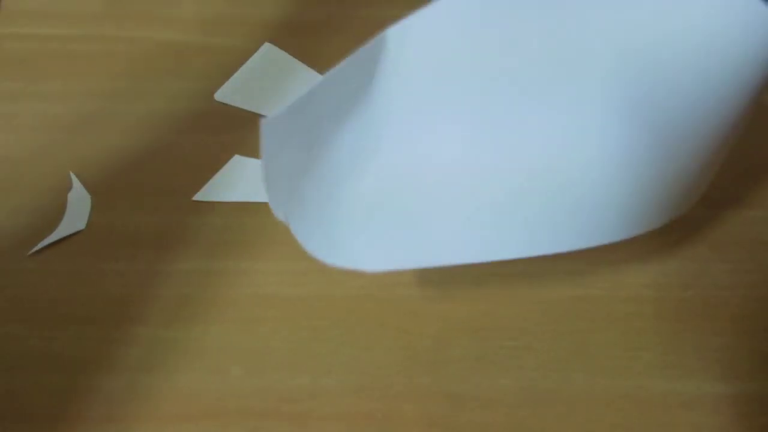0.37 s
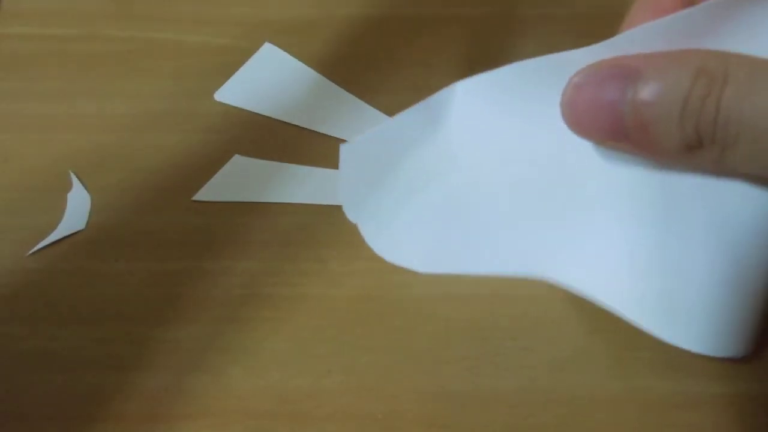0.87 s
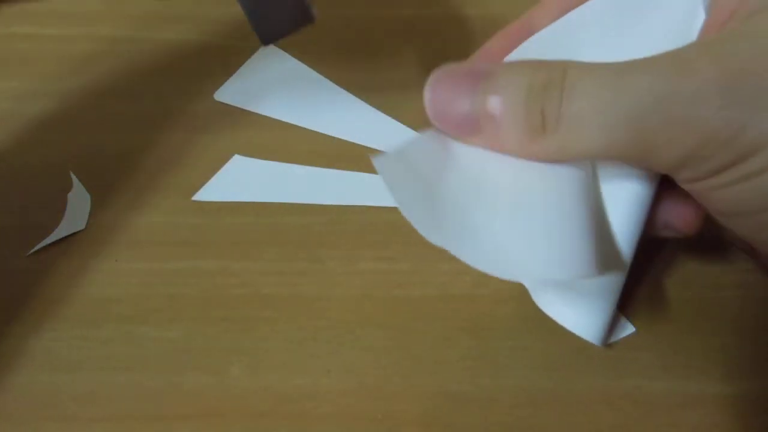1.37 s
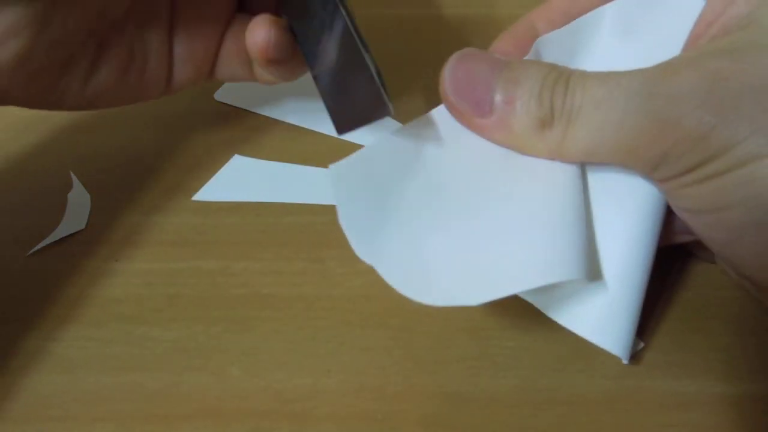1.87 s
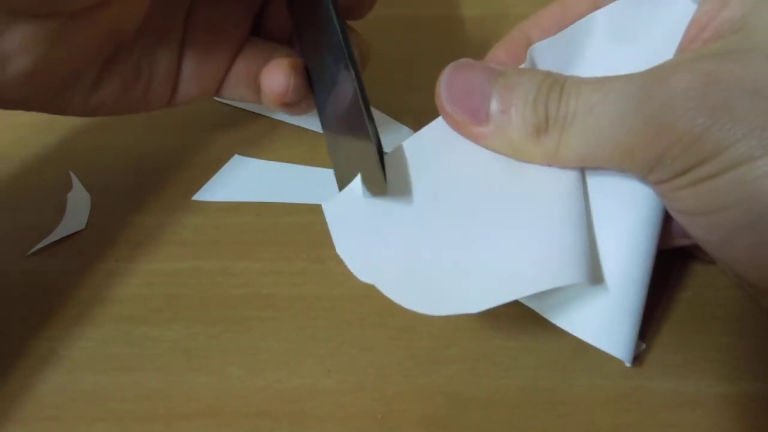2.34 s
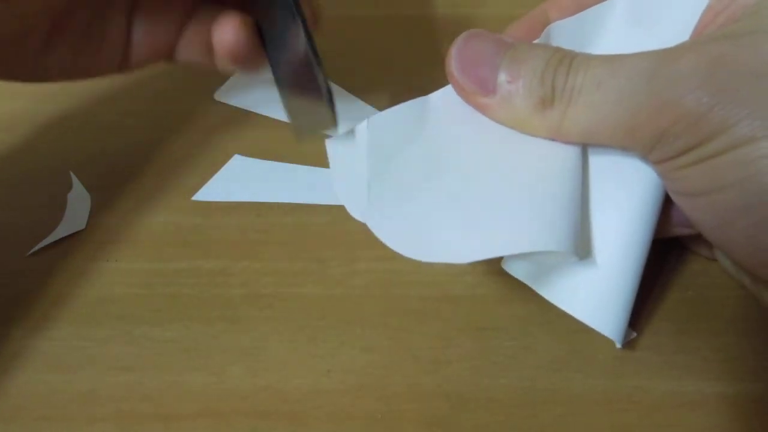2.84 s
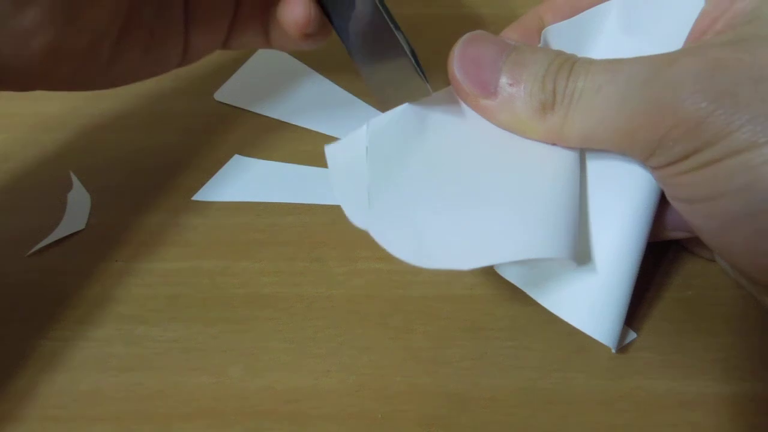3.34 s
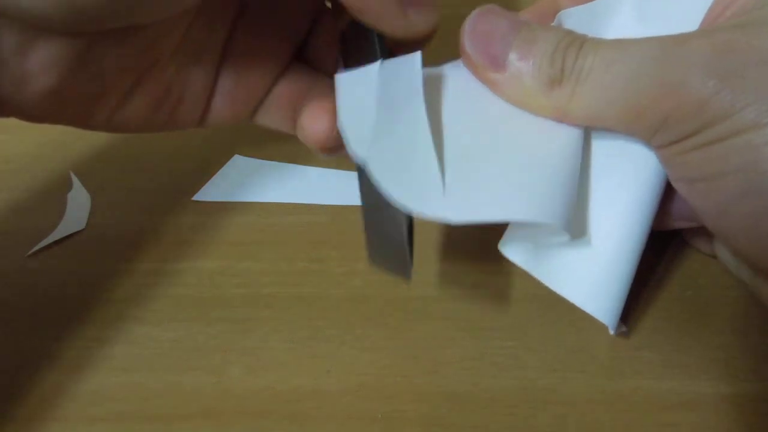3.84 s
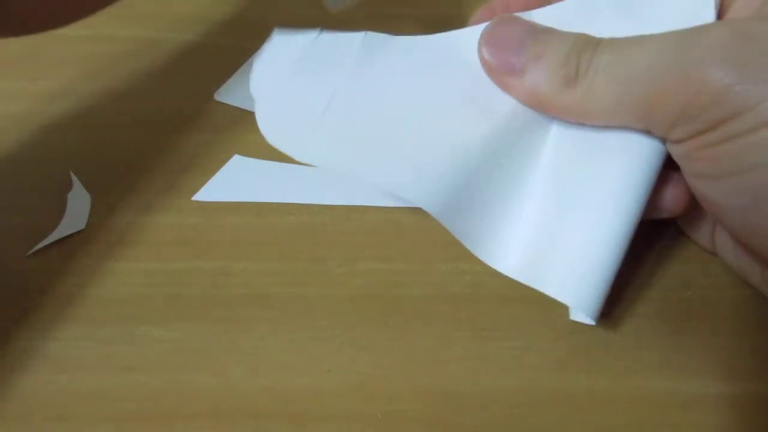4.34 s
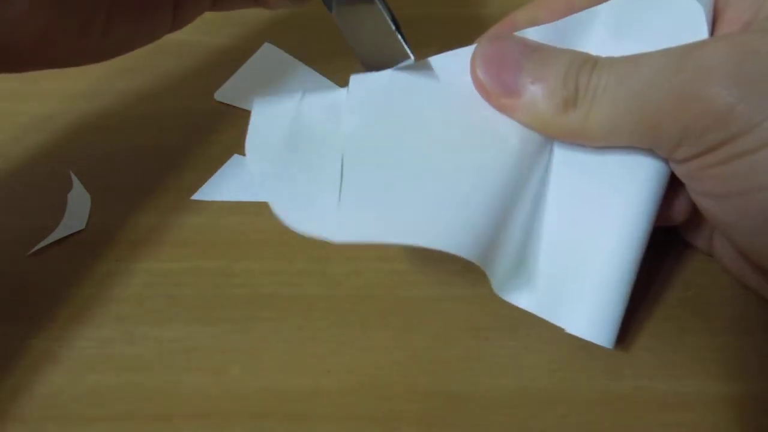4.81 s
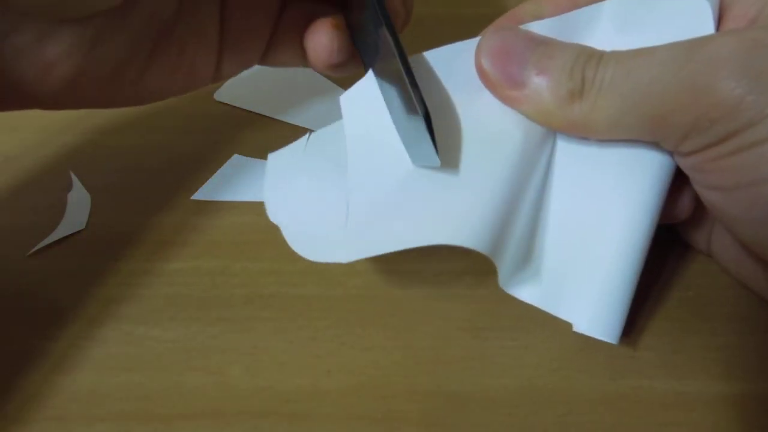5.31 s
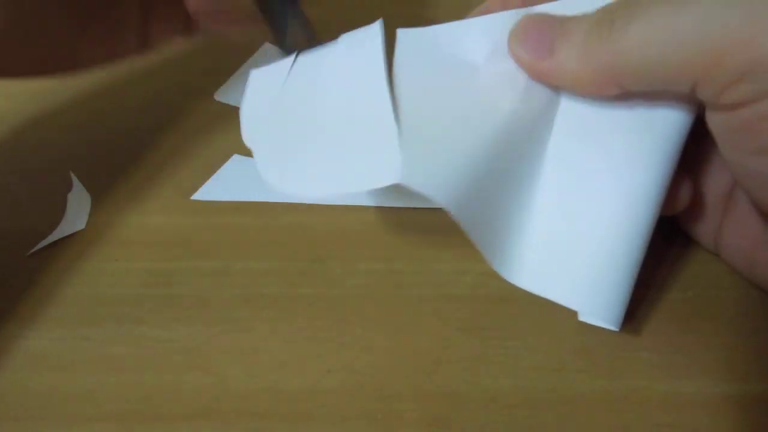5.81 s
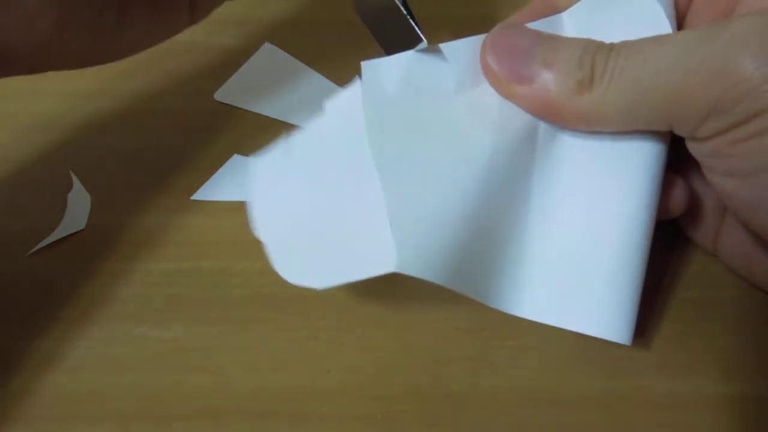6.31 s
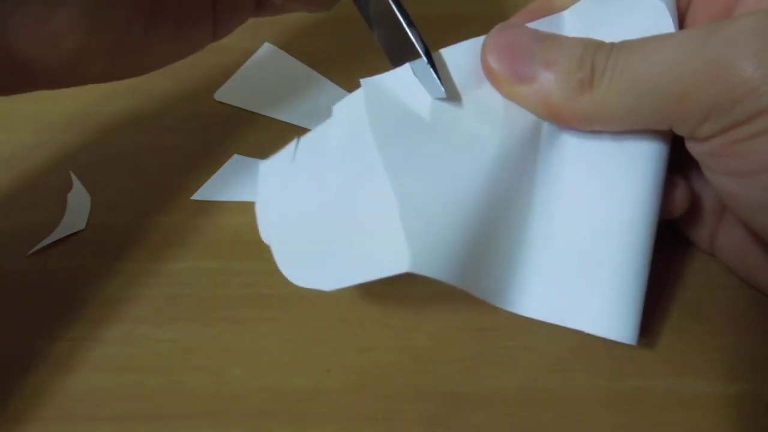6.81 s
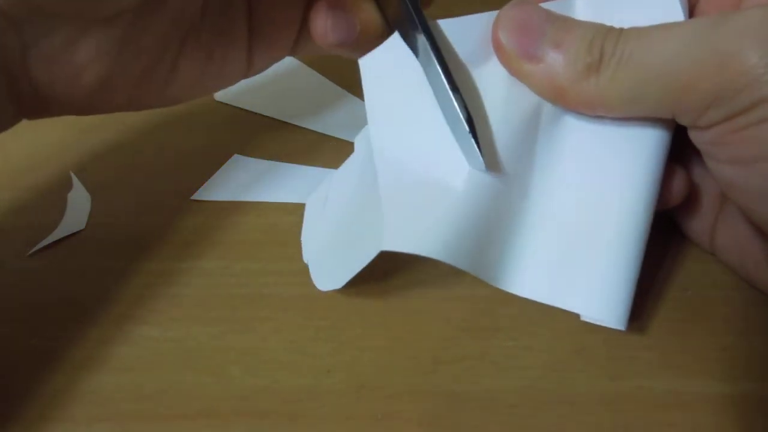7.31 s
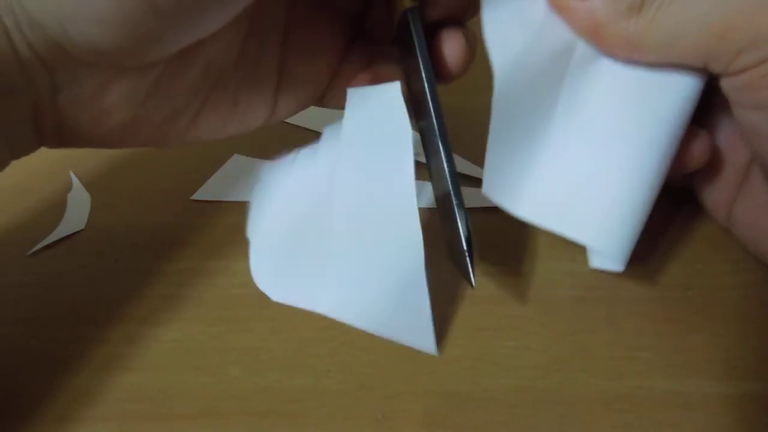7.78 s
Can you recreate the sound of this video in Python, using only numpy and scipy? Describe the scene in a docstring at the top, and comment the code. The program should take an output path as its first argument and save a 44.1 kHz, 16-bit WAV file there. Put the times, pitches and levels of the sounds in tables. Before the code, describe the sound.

A sheet of paper is shifted by hand just above a wooden table, with crinkles, snaps and dull low knocks. After a near-quiet pause, a sharp knife cuts it in four separate raspy strokes, with small rustles and crease pops between them. Very close stereo microphone, dry quiet room, faint hiss and low hum behind.

```python
"""Knife slicing a sheet of paper

A sharp knife slices a hand-held sheet of paper just above a wooden table in a quiet room.
Parting fibres are random clicks, creases snap as short ragged bursts, and fingers rub the sheet between
strokes; all of these drive broad, shifting resonances of the paper, with close echoes.
Bumps on the table are a low thud and fading tones, moving hands are lumpy low noise.
Behind them lie room tone, hiss, a far-off appliance's wavering hum and a low tone that swells and sinks.
"""
import sys
import numpy as np
from scipy import signal
from scipy.io import wavfile
from scipy.ndimage import uniform_filter1d

SR = 44100
rng = np.random.default_rng(int(sys.argv[2]) if len(sys.argv) > 2 else 0)


def wav_out(sig):
    """Save sig, one row per channel (or a flat mono array), as 16-bit PCM at SR to the path in sys.argv[1]."""
    wavfile.write(sys.argv[1], SR, np.round(np.clip(np.atleast_2d(sig).T, -1, 1) * 32767).astype(np.int16))


def volts(x):
    """Linear amplitude factor 10**(x/20) for a level x in dB, scalar or array-like."""
    e = np.asarray(x, float) / 20
    return 10 ** e


N = 348831   # length in samples

# Knife strokes, one list each: start_s, crackle_db, body_db (the sheet's belly against the crackle),
# hump_hz and hump_db (bright hump of the free flap)
CUT_STROKES = [
    [(2.27, -32, -0.5, 2940, 6.7), (2.284, -28.5, -15, 2940, 4), (2.31, -33, -14, 2940, 4.3),
     (2.338, -24, -10, 3030, 3.7), (2.38, -25.5, -14.5, 1870, 1.5), (2.391, -32, -11, 1900, 2),
     (2.404, -26, -8.5, 2000, 1.2), (2.518, -20, -14.5, 4360, 5.3), (2.568, -20.5, -14, 3000, 2.4),
     (2.67, -18.5, -13, 3670, 5), (2.704, -19.5, -10, 2350, 1.3), (2.727, -43.5, -9, 1890, 4.2)],
    [(3.487, -32, -10, 4140, 5.4), (3.591, -15.5, -13.5, 3000, 6.5), (3.635, -16, -14.5, 3340, 10.7),
     (3.771, -15, -20, 2420, 2.6), (3.799, -14, -13, 3140, 3.6), (3.859, -15, -17.5, 3600, 11),
     (3.899, -21, -3.5, 2820, 7.5), (3.915, -33.5, -12, 2600, 4.6)],
    [(5.008, -19.5, -15, 2840, 9.3), (5.088, -13, -20, 3220, 11.8), (5.416, -21, -13.5, 2220, 5.3),
     (5.456, -16.5, -16, 1940, 1.4), (5.536, -20, -11.5, 1720, 1.4), (5.582, -21.5, -8.5, 1400, 1.9),
     (5.614, -19.5, -10, 1170, 5.2), (5.64, -39.5, -1, 1300, 3.6)],
    [(6.674, -33, -13.5, 2990, 7.2), (6.712, -29.5, -16, 3290, 6.7), (6.74, -21, -18.5, 3420, 6.6),
     (6.814, -20.5, -15, 2960, 5.3), (6.864, -23, -18.5, 2960, 3.3), (6.904, -24, -19.5, 2840, 3.2),
     (6.966, -34.5, -17, 2390, 3.9), (6.988, -20.5, -15, 3100, 4.1), (7.0, -18, -21, 2810, 2.4),
     (7.064, -20, -14.5, 3030, 2), (7.13, -18, -20, 2560, 10.7), (7.182, -26, -18.5, 2550, 5.2),
     (7.265, -31, -17, 2750, 5), (7.386, -21.5, -17.5, 2020, 3.1), (7.424, -20, -18, 1970, 3.1),
     (7.46, -23, -23, 2550, 2.6), (7.52, -26.5, -15, 2500, 4.9), (7.546, -13, -10, 2120, 2.3),
     (7.572, -15, -19, 2000, 2.6), (7.64, -15.5, -16, 2720, 4.5), (7.71, -22.5, -14, 2940, 8.1),
     (7.798, -27.5, -10, 2680, 5.9), (7.854, -28, -32, 3000, 6.1), (7.864, -81, -8, 3040, 4)],
]
USUAL_BODY_DB = -15   # body level at which the zones keep their usual balance


def rms_one(x):
    """Scales a signal to unit power."""
    return x / np.sqrt(np.mean(x ** 2) + 1e-20)


def at_hz(points, hz, axis=1):
    """Reads one column of a table between its rows, over log frequency."""
    points = np.array(points)
    return np.interp(np.log(hz), np.log(points[:, 0]), points[:, axis])


def over_time(points):
    """Glides every column of a table whose first column is time in s."""
    start_s, *columns = np.transpose(points)
    return [np.interp(np.arange(N) / SR, start_s, column) for column in columns]


def drift(rate_hz):
    """Slow random wandering of spread 1: smoothed noise, worked out at every 40th sample."""
    r = np.exp(-80 * np.pi * rate_hz / SR)
    noise = rng.standard_normal(N // 40 + 2002)
    slow = signal.lfilter([1], [1, -2 * r, r * r], noise)[2000:]   # leave out the filter's start
    return np.interp(np.arange(N) / 40, np.arange(len(slow)), rms_one(slow))


def resonance(x, hz, width_hz):
    """Two-pole resonance that passes unit white noise at unit power."""
    r = np.exp(-np.pi * width_hz / SR)
    b = np.sqrt((1 - r * r) / 2) * np.array([1, 0, -1])
    return signal.lfilter(b, [1, -2 * r * np.cos(2 * np.pi * hz / SR), r * r], x + 1e-18)


def hiss():
    """Each microphone's own hiss: separate white noise left and right."""
    return volts(-50.5) * rng.standard_normal((2, N))


def still_air():
    """Room tone: noise in half-octave bands, each wandering in level and with its own left-right likeness."""
    # Room tone spectrum: pitch_hz, level_db (relative)
    spectrum = [(15, -46), (35, -4.5), (55, -26), (88, -14.5), (125, -4), (177, -22.5), (351, -12),
                (562, -18.5), (763, -13.5), (944, -26), (1440, -13.5), (1550, -19), (2100, -21.5),
                (7000, -49.5)]
    # How alike left and right are: pitch_hz, likeness (1 = the same, 0 = unrelated)
    likeness = [(60, 0.65), (240, 0.71), (950, 0.93), (3760, 1), (14900, 0.14)]
    air_db, patchy_db = -45.5, 2.0
    out, edges = 0, 22 * 2 ** np.arange(0, 8.6, .5)
    white = rng.standard_normal((2, 2, N))
    for k, (low, high) in enumerate(zip(edges, edges[1:])):
        band = signal.butter(2, [low, high], "band", fs=SR, output="sos")
        mid, side = signal.sosfilt(band, white[k % 2])   # neighbouring bands use different noise
        hz = np.sqrt(low * high)
        alike = np.clip(at_hz(likeness, hz), -1, 1)
        gain = volts(at_hz(spectrum, hz) + patchy_db * drift(2.2))
        out = out + gain * (np.sqrt(1 + alike) * mid + np.sqrt(1 - alike) * side * [[1], [-1]])
    return volts(air_db) * rms_one(out)


def appliance():
    """Hum lines, low to middle pitch: a steady tone plus noise twice through a narrow resonance, so each wavers."""
    # Hum lines: pitch_hz, width_hz (of each resonance), level_db
    lines = [(121.5, 20, -52), (883, 13, -62.5), (1434, 1.7, -60)]
    steady = 0.6   # share of each line's power that holds still
    white, t, out = rng.standard_normal(N), np.arange(N) / SR, 0
    for hz, width_hz, level_db in lines:
        wavering = rms_one(resonance(resonance(white, hz, width_hz), hz, width_hz))
        tone = np.sqrt(2) * np.sin(2 * np.pi * hz * t)
        out = out + volts(level_db) * (np.sqrt(steady) * tone + np.sqrt(1 - steady) * wavering)
    return out


def drone():
    """A sine of one low pitch whose level swells and sinks."""
    # Level of the low tone: start_s, level_db
    swell = [(0.0, -55), (2.6, -55), (3.2, -69), (3.6, -51.5), (6.5, -53.5), (6.85, -72), (7.3, -51)]
    pitch_hz = 67.7
    level_db, = over_time(swell)
    return np.sqrt(2) * volts(level_db) * np.sin(2 * np.pi * pitch_hz * np.arange(N) / SR)


def hands():
    """Dull shuffle of hands moving on the table: low, lumpy noise carried by the table top."""
    # Level of the shuffle: start_s, level_db (before the lumps)
    shuffle = [(0.0, -51), (0.632, -53), (1.202, -47.5), (1.6, -63)]
    lumpy_db = 6.0
    band = signal.butter(2, [85, 400], "band", fs=SR, output="sos")
    noise = signal.sosfilt(band, rng.standard_normal(N))
    level_db = np.interp(np.arange(N) / SR, *np.transpose(shuffle), right=-120)   # silent after the last row
    return rms_one(noise) * volts(level_db + lumpy_db * drift(16.0))


def bumps():
    """Hand and sheet knock the table: the top swings low as flesh lands, damped modes ring, a sway follows."""
    # Knocks: start_s, ring_db (for all modes), low_db (for thud and sway); both relative
    knocks = [(0.033, -18.5, -60), (0.259, -27, -44), (0.281, -13.5, -55), (0.443, -29, -50),
              (0.496, -21, -58), (0.584, -17.5, -29), (0.607, -28, -31), (0.643, -27, -42),
              (0.732, -20.5, -44), (1.029, -24, -50), (3.909, -20.5, -65), (5.774, -15.5, -51),
              (5.85, -28, -49), (7.556, -20, -71)]
    # Modes of the table top: pitch_hz, level_db (relative), t60_s (time to fade by 60 dB)
    modes = [(301, 5.5, 0.031), (407, 1.5, 0.031), (550, -11, 0.096), (756, 7.5, 0.026),
             (1100, -21, 0.0095), (1620, -3, 0.019)]
    thud_hz, thud_db, thud_t60_s, thud_lean_db = 52, 21.5, 0.075, -2.2
    thud_swell_s, thud_lead_s = 0.011, 0.011   # the thud starts ahead of the ringing
    sway_hz, sway_db, sway_t60_s = 68.4, -23.0, 1.0   # level against the thud
    luck_db = 6   # range of mode strengths from knock to knock
    length = 20000
    out, t = np.zeros((2, N + length)), np.arange(length) / SR
    soft = 1 - np.exp(-(t / 0.0021) ** 2)   # flesh and paper: a rounded start
    swell = 1 - np.exp(-(t / thud_swell_s) ** 2)
    lean = volts(np.array([[thud_lean_db], [-thud_lean_db]]))
    for start_s, ring_db, low_db in knocks:
        thud = lean * volts(low_db + thud_db - 60 * t / thud_t60_s) * np.sin(2 * np.pi * thud_hz * t)
        sway = volts(low_db + thud_db + sway_db - 60 * t / sway_t60_s) * np.sin(2 * np.pi * sway_hz * t)
        i = round((start_s - thud_lead_s) * SR)
        out[:, i:i + length] += (thud + sway) * swell
        i = round(start_s * SR)
        for (hz, level_db, t60_s), (luck, turn) in zip(modes, rng.random((len(modes), 2))):
            fade = volts(ring_db + level_db + luck_db * (luck - 2.0) - 60 * t / t60_s)
            out[:, i:i + length] += soft * fade * np.sin(2 * np.pi * (hz * t + turn))
    return out[:, :N]


def room(x):
    """Close echoes off table, hands and folds ripple the spectrum finely; they change as the sheet moves."""
    echo_db, echo_t60_s = -6.5, 0.032
    hop = 2500   # samples from one echo pattern to the next; neighbours crossfade
    t = np.arange(3000) / SR
    shape = volts(-60 * t / echo_t60_s) * (t > .0006)
    x, fade = np.pad(x, ((0, 0), (hop, 2 * hop))), np.hanning(2 * hop)
    out = np.zeros((len(x), x.shape[1] + 2 * hop))
    for i in range(0, N + hop, hop):
        tail = shape * rng.standard_normal((1, len(t))) / np.sqrt(np.sum(shape ** 2))
        echo = signal.fftconvolve(x[:, i:i + 2 * hop] * fade, tail, axes=1)
        out[:, i:i + echo.shape[1]] += echo
    return volts(echo_db) * out[:, hop:hop + N]


def snap_force():
    """Creases snap: a faint creep, then milliseconds of ragged force; strong snaps break with one sharp crack.

    The more belly a snap has, the duller it is."""
    # Creases snapping: start_s, peak_db (of the ragged burst), belly_db (gain of the belly zone)
    snaps = [(0.2715, -9, -8), (0.5418, -24, -20), (0.7325, -9.5, -12), (0.869, -17, -12),
             (1.0275, -9.5, -10), (1.158, -15.5, -9), (1.18, -23, -18), (1.201, -18, -14), (1.496, -22, -5),
             (1.27, -16.5, -20), (1.6997, -32, -7), (1.866, -23, -8), (1.8972, -21.5, -17),
             (2.21, -25, -17), (2.2473, -16.5, -15), (2.6948, -9, -25), (2.7019, -11, -3),
             (2.901, -18.5, -6), (3.376, -23, -13), (3.449, -24, -16), (3.4845, -13.5, -14),
             (3.5018, -12, -17.5), (3.918, -14, -8), (4.044, -20.5, -11), (4.061, -17.5, -11),
             (4.0923, -9.5, -10.5), (4.0973, -9.5, -12), (4.254, -21, -22), (4.343, -19, -16),
             (4.396, -15, -19), (4.5048, -14.5, -16), (4.5638, -18, -17), (4.623, -18, -6),
             (4.6627, -22.5, -8), (4.87, -24.5, -9), (4.9444, -27, -16), (4.969, -12, -16),
             (4.989, -12, -16), (5.007, -9, -24), (5.682, -12, -18), (5.7534, -9, -19), (5.7687, -9, -9),
             (5.7711, -5, -14.5), (5.7971, -11.5, -9), (6.08, -19, -12.5), (6.182, -24, -12),
             (6.234, -17.5, -15), (6.284, -16.5, -18), (6.3287, -18, -17), (6.3604, -16.5, -13),
             (6.514, -19, -23), (6.5239, -10, -15), (6.541, -8, -14.5), (6.669, -18, -17),
             (7.5525, -12.5, -4), (7.563, -8.5, -6), (7.847, -36.5, -21.5), (7.874, -12.5, -15)]
    rise_s, t60_s, creep_db, crack_db = 0.0018, 0.013, -32.5, 24.5
    # zones middle, edge, cut: usual gain, and share of the belly's swing that each follows
    others_db, follows = np.array([-8.0, -8.0, -8.5]), np.array([0.3, -0.4, -0.6])
    lead, length = 500, 2000   # samples
    force, t = np.zeros((4, N + length)), np.arange(-lead, length - lead) / SR
    after = np.maximum(t, 0)
    shape = volts(-60 * after / t60_s) * (1 - np.exp(-(after / rise_s) ** 2))
    shape += volts(creep_db - 60 * np.abs(t) / 0.21)
    for start_s, peak_db, belly_db in snaps:
        burst = shape * rng.standard_normal(length) * volts(2.5 * rng.standard_normal(length))
        burst *= volts(peak_db) / np.abs(burst).max()
        burst[lead + round(rise_s * SR)] = volts(crack_db + 2.03 * peak_db)   # the crack is one sample
        zones_db = np.r_[belly_db, others_db + follows * (belly_db - USUAL_BODY_DB)]
        i = round(start_s * SR) - lead
        force[:, i:i + length] += burst * volts(zones_db)[:, None]
    return force[:, :N]


def stroke_force():
    """Gain of the crackle in each zone, nothing between strokes and rubs; and the flap's hump in Hz and dB."""
    # Fingers rub and shift the sheet, pressure gliding from start to end:
    # start_s, length_s, start_db, end_db, body_db
    rubs = [(0.0, 0.093, -41, -35, -16.5), (0.113, 0.14, -38, -33, -14.5), (0.251, 0.072, -16, -38, -19),
            (0.294, 0.11, -25, -28.5, -11), (0.416, 0.081, -36.5, -25.5, -13),
            (0.518, 0.094, -35, -23, -20), (0.617, 0.12, -25.5, -32.5, -13.5),
            (0.719, 0.1, -26.5, -27.5, -13.5), (0.811, 0.023, -19.5, -17, -19),
            (0.85, 0.094, -29.5, -34.5, -11.5), (0.954, 0.11, -26.5, -21, -11.5),
            (1.052, 0.061, -23.5, -26, -3.5), (1.108, 0.08, -39, -38.5, -8.5),
            (1.194, 0.15, -37, -32, -7.5), (1.342, 0.11, -24, -31, -18), (1.46, 0.1, -48, -46, 0),
            (1.568, 0.12, -30, -34.5, -11), (1.699, 0.17, -50, -51, 1.5), (2.175, 0.066, -55, -42.5, -6),
            (2.708, 0.07, -35.5, -42, -4), (3.905, 0.12, -25.5, -43.5, -15),
            (4.103, 0.13, -28.5, -40.5, -14.5), (4.244, 0.093, -37.5, -44, -5),
            (4.328, 0.1, -32.5, -32, -14.5), (4.959, 0.033, -35, -28.5, -10),
            (5.625, 0.065, -28.5, -32, -11.5), (5.69, 0.037, -41, -45.5, 1.5), (5.737, 0.053, -15, -38, -7),
            (5.782, 0.072, -30, -24, -16), (5.86, 0.1, -30.5, -40.5, -9.5), (5.956, 0.11, -24.5, -51, -13),
            (6.348, 0.057, -21.5, -47, -13), (6.514, 0.072, -15.5, -23.5, -18),
            (6.598, 0.058, -19, -40, -13), (7.866, 0.041, -22, -54, -12)]
    # Hump of the free flap while the sheet is only handled: start_s, hump_hz, hump_db
    flap = [(0.3, 2500, 6), (0.75, 2020, -2), (0.84, 4660, 1), (1.08, 2010, 3), (1.3, 3940, 1.5)]
    # Zones belly, middle, edge, cut: level_db against the crackle, in strokes and in rubs
    cut_zones_db = np.array([-15.5, -11, -5.5, -5])[:, None]
    rub_zones_db = np.array([-14.5, -8.5, -3.5, -4.5])[:, None]
    # The same zones: share of the body's swing that each follows
    follows = np.array([1, 0.64, 0.12, -0.039])[:, None]
    attack_s, release_s = 0.022, 0.038   # of a rub
    t, gain = np.arange(N) / SR, np.zeros((4, N))
    flap_hz, flap_db = over_time(flap)
    for rows in CUT_STROKES:
        start_s, level_db, body_db, hump_hz, hump_db = np.transpose(rows)
        on = slice(round(start_s[0] * SR), round(start_s[-1] * SR))
        body_swing_db = np.interp(t[on], start_s, body_db) - USUAL_BODY_DB
        zones_db = cut_zones_db + follows * body_swing_db
        gain[:, on] += volts(np.interp(t[on], start_s, level_db) + zones_db)
        flap_hz[on] = np.interp(t[on], start_s, hump_hz)
        flap_db[on] = np.interp(t[on], start_s, hump_db)
    for start_s, length_s, start_db, end_db, body_db in rubs:
        on = slice(round(start_s * SR), round((start_s + length_s + release_s) * SR))
        age = t[on] - start_s
        shape = np.minimum(age / attack_s, 1 + (length_s - age) / release_s)
        shape = np.clip(shape, 0, 1) ** 2
        zones_db = rub_zones_db + follows * (body_db - USUAL_BODY_DB)
        gain[:, on] += shape * volts(np.interp(age, [0, length_s], [start_db, end_db]) + zones_db)
    return uniform_filter1d(gain, size=132, axis=1), flap_hz, flap_db   # 3 ms smoothing


def fibres(effort):
    """Fibres parting: random clicks of uneven size; at low effort fewer, with more sticking and slipping."""
    per_s, spread_db, clump_db = 5000, 1.5, 0.9   # click rate at full effort
    sizes = volts(spread_db * np.minimum(rng.exponential(1, N), 4)) * rng.choice([-1, 1], N)
    clumps = volts(clump_db * (drift(38.0) / np.sqrt(effort) + 0.95 * drift(176.0)))
    parting = rng.random(N) < per_s * effort / SR
    return rms_one(sizes * clumps * parting / np.sqrt(effort))


def tough_fibres(force, effort):
    """Tough fibres part with a dry tick: sparse single-sample clicks with the low end cut, past the modes."""
    per_s, tick_db, low_cut_hz = 260, 9, 2500
    ticks = rng.standard_normal(N) * (rng.random(N) < per_s / SR) * force / np.sqrt(effort)
    high_pass = signal.butter(2, low_cut_hz, "high", fs=SR, output="sos")
    return volts(tick_db) * signal.sosfilt(high_pass, ticks + 1e-18)


def hump(hz, centre_octave, height_db, half_width_octaves):
    """Rounded rise or hollow in dB around a moving pitch, given as log2 of Hz."""
    away = (np.log2(hz) - centre_octave) / half_width_octaves
    return height_db * np.maximum(1 - away ** 2, 0)


def sheet():
    """Damped bending modes of the paper; their strengths wander at random, as a flexing sheet's would.

    Returns the stereo paper, and the part whose echoes differ between the microphones."""
    # Zone borders (belly, middle, edge, cut): pitch_hz; the belly also takes in the modes from 300 Hz,
    # the cut those above the last border
    zones_hz = [600, 2000, 4800, 9300, 14300]
    # How strongly the sheet radiates, evened out within each zone: pitch_hz, level_db (per Hz, relative)
    radiation = [(300, -14), (389, -17), (503, -18.5), (901, -5.5), (1220, -6), (1560, 0), (2340, -9),
                 (2790, -8), (4760, -7.5), (7250, -8), (7990, -9), (12000, -11), (13600, -9.5),
                 (14300, -7.5)]
    # Stereo: pitch_hz, left_over_right_db, apart_db (differing part against the mode, before its echo)
    lean_table = [(2730, -0.5, -30), (4500, 2, -17), (6340, -0.5, -9), (8260, 1.5, -1.5), (13900, 3.5, 1.5)]
    # Upper bright hump of the paper, in handling and cutting alike, moving as the sheet turns:
    # start_s, pitch_hz, level_db
    upper_hump = [(1.06, 11700, 7), (1.45, 12200, 6.5), (2.3, 8250, 4.5), (2.48, 8200, 2), (2.55, 13100, 2),
                  (2.7, 12000, 5), (3.7, 12300, 5.5), (3.78, 7200, 5.5), (3.88, 7240, 3), (4.1, 12000, 7.5),
                  (5.3, 11900, 1), (5.36, 7700, 4.5), (5.5, 7660, -2), (5.6, 11600, 7.5),
                  (7.03, 11500, 5.5), (7.07, 6500, 9), (7.16, 7200, 1), (7.35, 12800, 5),
                  (7.68, 12500, 5.5)]
    # Hollow where sound off the sheet and off the table cancel, moving with the sheet's height:
    # start_s, pitch_hz, level_db
    hollow = [(1.35, 5470, -4.5), (2.35, 4970, 0), (3.62, 5400, -6), (3.76, 4500, -3), (5.15, 4600, -2),
              (5.38, 5800, -8), (5.55, 4600, -2.5), (6.75, 4950, -7), (7.25, 4360, 0.5), (7.6, 5000, -7)]
    overlap = 1.757   # width of each resonance against the spacing of the modes
    flap_octaves, upper_octaves, dip_octaves = 0.56, 0.27, 0.27   # half widths
    full_db, least_effort = -22.0, 0.25   # cut-zone gain that counts as full effort
    gain, flap_hz, flap_db = stroke_force()
    cutting = np.zeros(N)
    for rows in CUT_STROKES:
        cutting[round(rows[0][0] * SR):round(rows[-1][0] * SR)] = 1
    effort = np.where(cutting, np.clip(gain[3] / volts(full_db), least_effort, 1), 1)   # skin rubs densely
    bend_db = 1.8 * (1 + cutting) / 2   # the sheet flexes most under the blade
    force = gain * fibres(effort) + snap_force()

    edges = np.concatenate([np.geomspace(300, 2000, 12), np.geomspace(2200, 14600, 30)])
    centres, widths = np.sqrt(edges[1:] * edges[:-1]), np.diff(edges)
    zone = np.clip(np.searchsorted(zones_hz, centres) - 1, 0, 3)
    share = volts(at_hz(radiation, centres)) * np.sqrt(widths)
    share = share / np.sqrt(np.bincount(zone, share ** 2))[zone]   # unit power in each zone
    bends = [drift(7.4) for k in range(11)]
    upper, upper_db = over_time([(s, np.log2(hz), db) for s, hz, db in upper_hump])   # glides in octaves
    dip, dip_db = over_time([(s, np.log2(hz), db) for s, hz, db in hollow])
    flap = np.log2(flap_hz)
    out, apart = np.zeros((2, N)), np.zeros(N)
    for k, (hz, width_hz) in enumerate(zip(centres, overlap * widths)):
        hump_db = hump(hz, flap, flap_db, flap_octaves)
        hump_db += hump(hz, upper, upper_db, upper_octaves)
        hump_db += hump(hz, dip, dip_db, dip_octaves)
        mode = resonance(force[zone[k]] * volts(bend_db * bends[k % 11] + hump_db), hz, width_hz)
        mode = resonance(mode, hz, width_hz) * np.sqrt(2 * np.pi * width_hz / SR)   # twice: steep skirts
        mode = (-1) ** k * share[k] * mode
        lean = volts(at_hz(lean_table, hz) / 2)
        out += mode * [[lean], [1 / lean]]
        apart += mode * volts(at_hz(lean_table, hz, axis=2))
    out += tough_fibres(cutting * gain[2], effort)
    return out, apart


def scene():
    """Paper close to the microphones, room tone all round, each microphone with its own hiss."""
    paper, apart = sheet()
    sides = room(apart[None] * volts(1.8 * drift(2.6))) * [[1], [-1]]   # echoes of opposite sign left and right
    background = still_air() + appliance() + drone() + hiss()
    return background + hands() + bumps() + sides + room(paper) + paper


def top_cut(x):
    """Nothing passes above the cut-off."""
    return signal.sosfilt(signal.butter(12, 15530, fs=SR, output="sos"), x)


def record(dry):
    """The top is cut steeply below 14.52 kHz, and the highest peaks clip."""
    low_pass = signal.cheby2(16, 60, 14520, fs=SR, output="sos")
    mix = np.clip(signal.sosfilt(low_pass, dry), -1, 1)
    return top_cut(mix)


dry = scene()
out = record(dry)
wav_out(out)
```